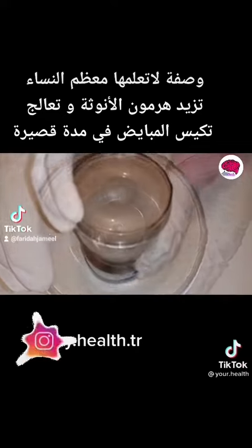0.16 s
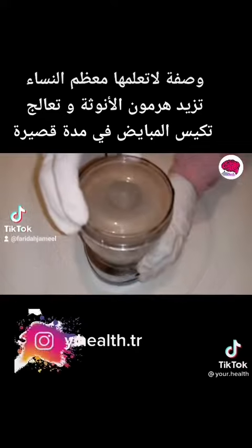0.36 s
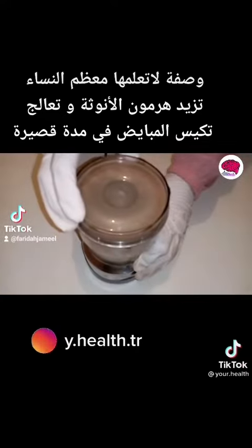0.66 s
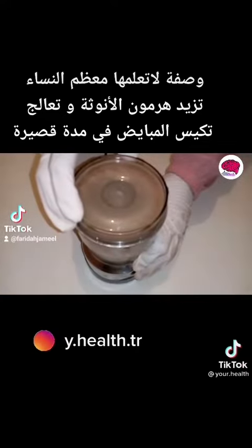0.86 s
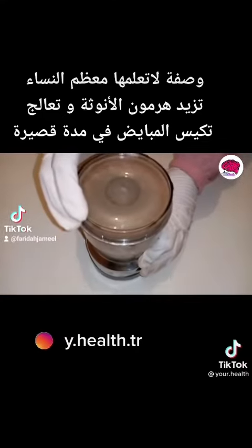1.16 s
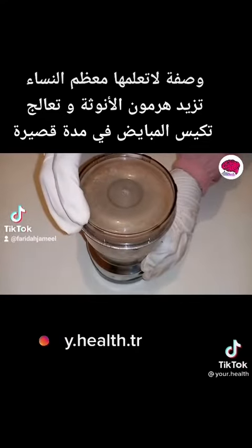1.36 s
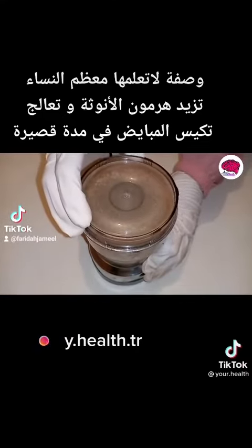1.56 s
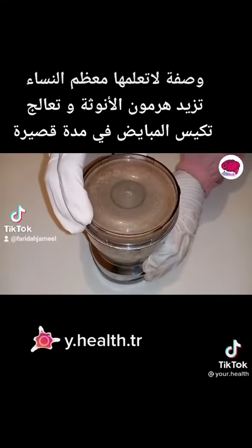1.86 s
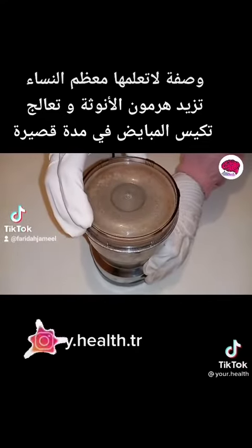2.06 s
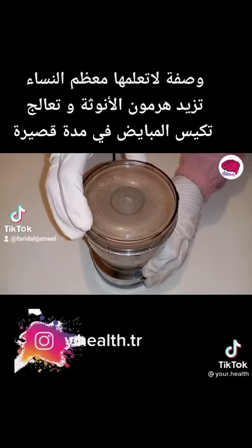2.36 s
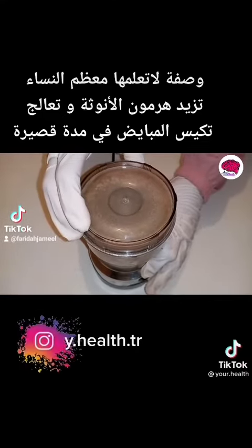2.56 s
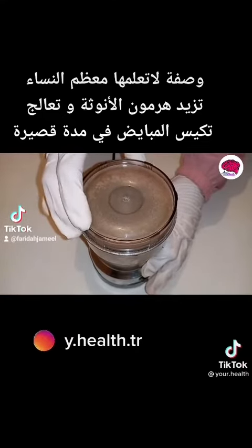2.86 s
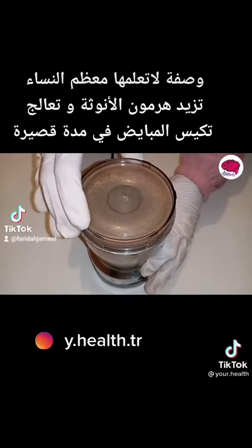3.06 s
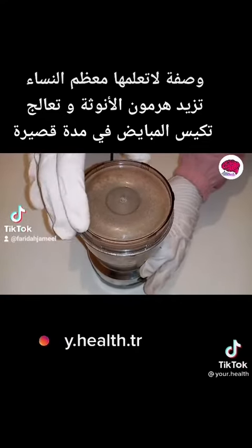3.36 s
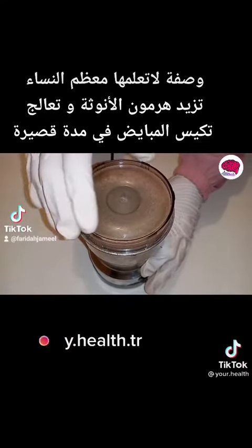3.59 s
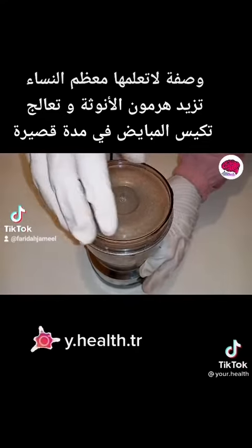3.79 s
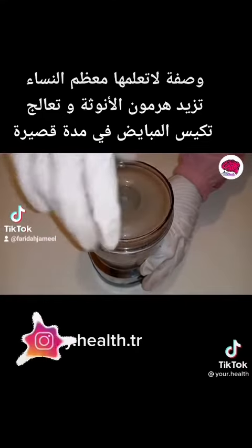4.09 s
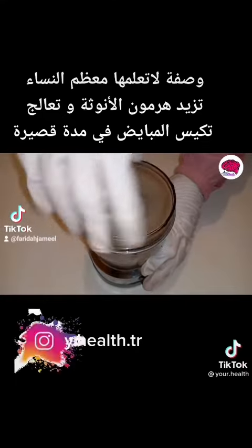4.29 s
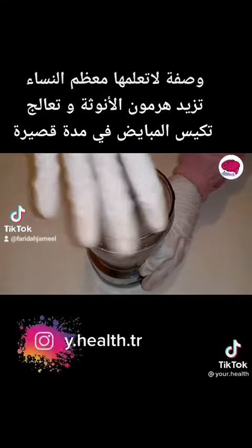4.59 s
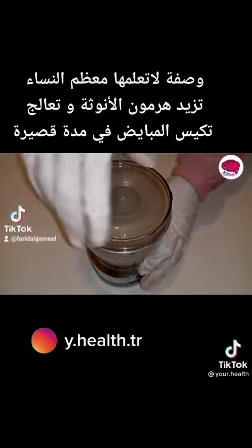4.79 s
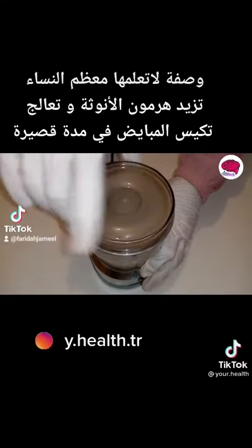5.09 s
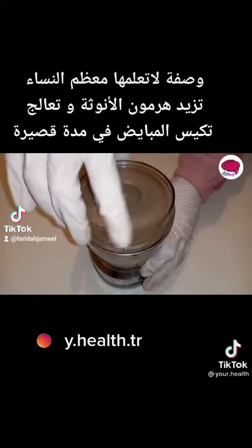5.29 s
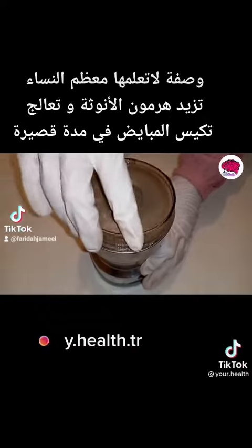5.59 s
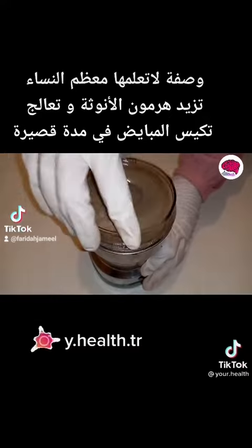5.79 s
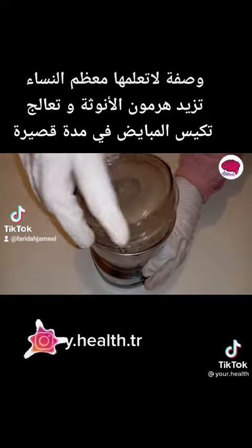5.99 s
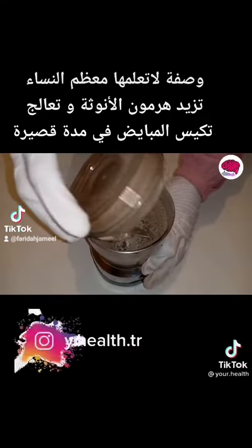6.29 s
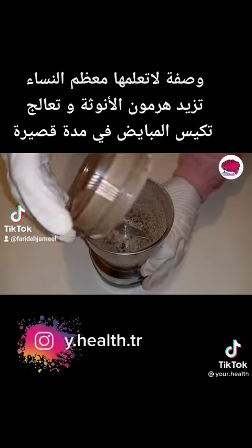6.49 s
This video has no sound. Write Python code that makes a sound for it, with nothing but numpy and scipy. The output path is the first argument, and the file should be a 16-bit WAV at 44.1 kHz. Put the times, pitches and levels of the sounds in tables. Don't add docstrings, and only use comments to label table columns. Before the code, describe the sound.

A small electric grinder whines steadily with powder hissing, spins down to silence, then gloved fingers rub, tap and lift off its plastic lid.

```python
import sys
import numpy as np
from scipy import signal
from scipy.fft import rfft, irfft, next_fast_len
from scipy.io import wavfile
from scipy.ndimage import uniform_filter1d, map_coordinates

SR = 44100
rng = np.random.default_rng(int(sys.argv[2]) if len(sys.argv) > 2 else 0)


def voltage_ratio(level):
    return 10 ** (np.asarray(level, float) / 20)


def log_audio(samples):
    frames = np.atleast_2d(samples).T
    limited = np.clip(frames, -1, 1)
    pcm = np.round(limited * 32767).astype(np.int16)
    wavfile.write(sys.argv[1], SR, pcm)


N = 293265

STAGES_S = [
    .15,
    .46,
    .56,
    .85,
    1.15,
    1.55,
]
# (multiple, level in each of the six stages [dB])
ORDER_DB = [(2, -15.5, -16, -17.5, -19.5, -15.5, -15.5), (3, -5, -0.5, -0.5, -1, -3.5, -4),
            (4, -16, -11.5, -11.5, -10.5, -1.5, -3.5), (5, -6, -5.5, -6, -5, -10.5, -6),
            (6, -17, -13.5, -14, -15.5, -11, -16), (7, -5.5, -2.5, -6.5, -11.5, 3.5, -7.5),
            (8, 0.5, -4.5, 5.5, -2.5, 2.5, -16), (9, -23, -31, -23.5, -12, -22, -34),
            (10, -31, -25.5, -21.5, -19.5, -26.5, -24), (11, -18.5, -9.5, -12, -13.5, -16, -17.5),
            (12, -14.5, -7.5, -9.5, -16.5, -20.5, -5.5), (13, -19, -16.5, -14, -16, -21.5, -18),
            (14, -22, -21, -5.5, -9.5, -15.5, -9), (15, -30.5, -26, -15, -16, -26.5, -25)]
# (time [s], shaft speed [Hz], strength [dB])
LOAD = [(0.0, 542.4, -25), (0.06, 543, -26), (0.16, 544, -28), (.21, 540, -26), (.35, 540.3, -27),
        (0.45, 541.1, -23.5), (0.66, 527.5, -27), (0.88, 526.6, -24), (1.02, 524, -27),
        (1.18, 515.9, -29.5), (1.33, 519.8, -28), (1.6, 517.8, -29.5), (2.18, 516.6, -28.5)]
# (shaft speed [Hz], level [dB])
BASE = [(130, -45.5), (170, -22.5), (277, -19.5), (304, -26.5), (350, -18.5), (420, -9.5), (517, -0.5),
        (541, -0.5)]
# (frequency [Hz], level [dB])
BLADE = [(390, -74), (520, -33.5), (650, -29.5), (830, -10.5), (910, -14), (1005, -2.5), (1120, -12.5),
         (1550, 1)]
# (frequency [Hz], level [dB])
HOUSING = [(400, -21), (700, -4), (950, 4), (1400, -12.5), (2100, -3.5), (3000, 5.5), (3700, -3.5),
           (4250, -3.5), (4700, -1.5), (7000, -2.5)]
LEAN = {1: (-7, 4), 2: (4, 2), 3: (-1, 2), 4: (3, 10), 5: (2, -3), 7: (-4, 2), 8: (7, 0)}
# (time [s], strength [dB])
SWIRL = [(0.0, -37), (0.24, -35.5), (0.7, -32), (1.67, -31.5), (2.14, -32.5), (2.66, -33.5), (2.92, -36),
         (3.16, -39), (3.25, -33.5), (3.3, -38.5), (3.37, -39.5), (3.42, -49.5), (3.52, -81), (3.62, -71.5)]
# (frequency [Hz], level [dB per Hz])
CUP = [(30, -14.5), (90, -11.5), (160, -25.5), (420, -15), (620, -11.5), (760, -15.5), (950, -5.5),
       (1200, -12.5), (1500, -16.5), (2000, -10.5), (3500, -120)]
CHURN = [(900, -42.5), (1300, -17.5), (1600, -6), (2200, -13), (3000, -5), (3800, -10.5), (4600, -7.5),
         (6000, -39), (9000, -120)]
HISS = [(2470, -35), (4200, -11.5), (4400, -11), (5710, -6.5), (6320, 0), (8160, -10), (9240, -9),
        (12200, -11.5), (13800, -7.5), (14400, -5), (15100, 0), (15900, -19.5), (16300, -48)]
# (frequency [Hz], width [Hz], level [dB])
ROCK = [(73.7, 58, -4), (137.7, 62, -6.5)]
# (time [s], frequency [Hz], level [dB])
SQUEAK = [
    (3.39, 867, -59),
    (3.45, 885, -43),
    (3.495, 882, -47),
    (3.555, 863, -83),
    (3.592, 864, -67),
    (3.62, 870, -80),
]
# (time [s], level [dB], jolt over it [dB], cup over it [dB])
KICKS = [(0.0094, -30.5, -40.5, -16.5), (0.136, -13, -6.5, -22), (0.3174, -25, -8.5, -12),
         (0.499, -15.5, -20.5, -9.5), (0.669, -22, -34, -26), (0.759, -19, -34, -21),
         (0.871, -16.5, -19, -31.5), (1.5299, -21, -10, -9.5), (1.7997, -27.5, -9, -16),
         (2.4999, -18, -43, -27), (2.79, -24, -19, -9), (2.825, -23.5, -21.5, -10.5),
         (2.9233, -10.5, -10.5, -23), (2.971, -22, -40.5, -31), (2.981, -24.5, -41.5, -31),
         (3.009, -22.5, -40, -30.5), (3.016, -25, -43, -28.5), (3.09, -24.5, -39.5, -25),
         (3.042, -22.5, -30, -25.5), (3.0633, -14.5, -44.5, -25.5), (3.101, -20.5, -42, -28),
         (3.1192, -17.5, -36, -21), (3.241, -19, -13.5, -11.5), (3.295, -27, -33.5, -23),
         (3.356, -26, -32, -21), (3.3792, -32, -35.5, -21)]
# (frequency [Hz], width [Hz], level [dB])
JOLT = [(83.4, 310, 3), (308, 760, 4.5), (885, 220, 0)]
STEEL = [(1112, 250, -6.5), (1860, 630, -1.5), (3030, 760, 0.5)]
SEED = [(4200, 400, -5.5), (6440, 870, 4.5), (9160, 2000, -0.5), (11800, 4400, -4.5), (15800, 1200, 2.5)]
SLAM = [(1150, 1100, 0)]
# (time [s], lid [dB], counter over lid [dB], nail over lid [dB])
TAPS = [(3.251, -35.5, -2.5, -14), (3.268, -26.5, -16.5, -18), (3.926, -35, -3, -19.5),
        (4.171, -24, -1, -26.5), (4.303, -54, 18, 19), (4.338, -28.5, -2, -9.5), (4.483, -28.5, -41.5, -28),
        (4.818, -21.5, -39.5, -25), (4.826, -16.5, -43, -18), (4.855, -13.5, -15, -27),
        (5.037, -34, -24.5, -19), (5.058, -28.5, -35.5, -15), (5.07, -32, -34.5, -19),
        (5.115, -26.5, -40, -20), (5.139, -26, -48, -15), (5.237, -29.5, -1.5, -19)]
# (time [s], level [dB])
SNAPS = [(3.59, -50), (4.271, -35.5), (4.665, -57), (4.761, -47.5), (4.905, -24.5), (4.914, -23.5),
         (5.347, -29), (5.422, -41.5), (5.686, -36), (5.801, -32), (5.81, -24.5), (5.83, -32)]
# (time [s], lid [dB], counter over lid [dB], nail over lid [dB])
LIFT = [
    (5.43, -37, 9.5, -13),
    (5.468, -34.5, 9, -1),
    (5.501, -42.5, 8.5, -20),
    (5.691, -50, -12, -11),
    (5.743, -57, -22, -16),
    (5.921, -38, 9.5, -1),
    (5.93, -48.5, 11.5, -9.5),
    (5.975, -59.5, 15.5, 2),
    (6.003, -63, 9, 4),
    (6.028, -56, 0, -12),
]
# (time [s], level [dB])
LID_CREAKS = [
    (4.561, -22),
    (4.578, -30),
    (4.672, -34.5),
    (4.783, -35),
]
# (frequency [Hz], width [Hz], level [dB])
COUNTER = [(96.3, 11, -3.5), (182, 13.5, 7), (270, 54, -2), (359.1, 50, -2.5)]
RIM = [(870, 110, -7), (937, 52, -10.5), (1002, 36, -10), (1628, 110, -14), (2000, 30, -16.5),
       (3020, 170, -15.5)]
TICK = [(4350, 130, 1.5), (6030, 554, 8), (6517, 900, 8.5), (7310, 820, 4.5), (8790, 950, -6),
        (12440, 760, -6.5), (15170, 1200, -2.5)]
CLINK = [(4700, 500, -9), (5900, 450, 4), (6500, 500, 5), (7300, 700, 8), (8840, 1040, -5),
         (12500, 900, -18)]
DRUM = [(368, 40, 0.0013)]
# (frequency [Hz], width [Hz], level [dB])
LOOSE = [(843, 210, -16.5), (1105.8, 37, 2.5), (1495, 750, -23.5), (1775, 36, -10), (2330, 92, -19),
         (2967, 209.4, -19), (3430, 110, -12.5)]
POP = [(878, 200, -9), (1110, 63, 5), (1900, 810, -18.5), (2930, 500, -21)]
RING = [(1115, 14, 0.0032)]
HOLLOW = [(705, 84, 5.5), (786, 29.5, -19)]
# (time [s], sliding time [s], lid at end [dB], grit over lid [dB], swell along slide [dB])
STROKES = [(3.787, .072, -47, -5.5, -11), (3.869, 0.12, -36.5, -6.5, -0.5), (4.071, 0.045, -32, -3, 7),
           (4.115, 0.055, -35, 0, 0), (4.287, 0.055, -30.5, -1, 5.5), (4.35, 0.089, -31.5, -4, -1.5),
           (4.476, 0.051, -38.5, -4.5, -2.5), (4.555, .0127, -65.5, 12, -4), (4.575, 0.0086, -56.5, 4, -2),
           (4.665, 0.034, -76, 14, 2), (4.762, 0.04, -67, 16, 8), (4.795, 0.064, -30, -5, 1.5),
           (4.898, .0103, -46.5, 12.5, 0), (5.0, .03, -68, 20, 5), (5.03, .07, -32, -9, 2),
           (5.1, 0.064, -33.5, -1, -1), (5.228, .05, -30.5, -5.5, 4), (5.28, 0.048, -35, -3, 0.5),
           (5.345, 0.038, -50, 7.5, -2), (5.424, .012, -37.5, -15, 0.5), (5.449, 0.014, -32.5, -3.5, 2),
           (5.48, 0.063, -46, -22.5, -9), (5.58, 0.267, -72, -3, 5), (5.635, 0.032, -77, 10.5, 0),
           (6.47, 0.15, -84, 11, 4)]
# (frequency [Hz], width [Hz], level [dB])
LID = [(919, 140, 3), (1056, 106, 6), (1500, 570, -12.5), (1820, 370, -8), (3028, 250, -12)]
CREAK = [(962, 30, -26), (2090, 62, 1), (2995, 280, -1)]
SING = [(1115, 50, 0), (1790, 50, -4), (2400, 70, -7), (3450, 90, -5)]
# (frequency [Hz], level [dB per Hz])
GRIT = [(1760, 8.5), (3000, -10), (4010, -5), (4340, -9), (5840, -3.5), (6870, -22), (8200, -8),
        (11400, -16.5), (13600, -24.5), (15000, -7.5), (15800, -33), (16300, -36.5)]
# (time [s], frequency [Hz], level [dB])
GAP = [
    (5.918, 717.3, -24),
    (5.934, 720, -27.5),
    (5.986, 699.3, -57),
    (6.046, 828, -53.5),
    (6.1, 776, -85),
]
# (frequency [Hz], level [dB])
KITCHEN = [(15, -66.5), (25, -21), (75, -9), (180, -12.5), (277, -27), (344, -16.5), (439, -28.5),
           (607, -24), (1020, -31), (2690, -29), (3720, -32.5), (16000, -42)]
# (frequency [Hz], time to fall 60 dB [s])
WALLS = [(150, 0.11), (1000, 0.25), (4000, 0.25), (14000, 0.021)]
# (frequency [Hz], level [dB])
LEFT = [(60, 5), (200, 2.5), (500, 8.5), (800, 4), (1500, 13.5), (2500, 7.5), (4500, 1.5), (7000, 8),
        (10000, -1), (15000, 1.5)]
# (frequency [Hz], likeness [0-1])
ALIKE = [(30, 0.82), (80, 0.92), (300, 0.71), (1500, 0.85), (3000, 0.53), (6000, 0.33), (15000, 0.2)]
# (frequency [Hz], phase [rad])
TWIST = [(250, 0), (520, 1.25), (541, 1.9), (1000, 0.18), (1400, 0), (1555, -.25), (1620, -.7), (2050, -.2),
         (2590, -.6), (2700, -1), (3300, 0)]
# (frequency [Hz], width [Hz], level [dB])
NOTCHES = [(4300, 200, -10), (8400, 400, -3), (12200, 450, -7), (13900, 300, -8)]
# (frequency [Hz], level [dB])
MASK = [(150, -36), (700, -24), (1500, -24), (3000, -19), (4300, -8), (6000, -10), (8500, -5.5),
        (11000, -3), (12200, -2), (13100, -3.5), (14000, -2), (15000, -7)]

OFF_S = 2.19
LOOSE_S = 5.42
STEADY_DB = 1.2


def unit(x):
    return x / np.sqrt(np.mean(x ** 2) + 1e-20)


def along(points, hz):
    f, v = np.transpose(points)
    return np.interp(np.log(hz + 1), np.log(f + 1), v)


def curves(rows):
    s, *cols = np.transpose(rows)
    return [np.interp(np.arange(N) / SR, s, c) for c in cols]


def gate(start, end, fade):
    t = np.arange(N) / SR
    return np.clip((t - start) / fade, 0, 1) * np.clip((end - t) / fade, 0, 1)


def wobble(rate):
    coarse = np.arange(0, N + 16, 16)
    knots = rng.standard_normal(int(N * rate / SR) + 4)
    return np.interp(np.arange(N), coarse, map_coordinates(knots, [coarse * rate / SR]))


def filtered(x, response):
    m = next_fast_len(N + SR // 2)
    return irfft(rfft(x, m) * response(np.fft.rfftfreq(m, 1 / SR)), m)[..., :N]


def modes(table):
    def response(f):
        return sum((-1) ** k * voltage_ratio(db) * 1j * f * w / (c * c - f * f + 1j * f * w)
                   for k, (c, w, db) in enumerate(table))
    return response


def shade(points):
    return lambda hz: voltage_ratio(along(points, hz))


def grains(grain_db, rate):
    size = voltage_ratio(grain_db * np.array([wobble(rate), wobble(rate)]))
    return size * rng.standard_normal((2, N))


def shaft():
    hz, db = curves(LOAD)
    drag_per_s, rub_hz = 1.15, 101.4
    off = np.clip(np.arange(N) / SR - OFF_S, 0, None)
    return np.clip((hz + rub_hz) * np.exp(-drag_per_s * off) - rub_hz, 1, None), db, off


def motor():
    hz, db, off = shaft()
    t = np.arange(N) / SR
    turn = 2 * np.pi * np.cumsum(hz * (1 + 0.001 * wobble(9) + .001 * wobble(35))) / SR
    regrip_s = 1.0
    after = np.clip((t - regrip_s) / .12 + .5, 0, 1)

    def line(k, level_db, flutter_db):
        flutter = flutter_db * wobble(14)
        flutter = flutter + 1.2 * gate(-1, 0.2, 0.06) * wobble(80)
        flutter = flutter + 10 * np.clip(off, 0, .5) * wobble(35)
        blur = 0.13 * k ** .5 * (1 + 5.5 * off) * wobble(60)
        tone = voltage_ratio(level_db + flutter) * np.sin(k * turn + blur + rng.uniform(0, 5.9))
        early, late = LEAN.get(k, (0, 0))
        alike = np.clip(along(ALIKE, k * hz[0]), .05, .95)
        lean = np.tanh((early + (late - early) * after) * np.log(10) / 40)
        return tone * np.array([1 + 0 * t, np.sqrt(alike / (1 - alike)) * lean])

    dip_db = sum(-7.5 * np.exp(-((t - s) / 0.013) ** 2) for s in (0.055, .15))
    whine = line(1, db + dip_db + along(BASE, hz) + 8.5, 0.36)
    orders_db = -20.5
    upper_db = orders_db - 23.5 * (1 - np.exp(-off / 0.44))
    for k, *stage_db in ORDER_DB:
        k, stage = round(k), np.interp(t, STAGES_S, stage_db)
        if k == 3:
            throb = 1 + 0.6 * gate(-1, 0.2, 0.14) * np.cos(2 * np.pi * 36 * (t - 0.011))
            whine += throb * line(k, orders_db + stage + along(BLADE, k * hz), 0.93)
            continue
        stage = stage - 22 * max(k - 8, 0) * np.clip(off, 0, 1)
        if k == 2:
            stage = stage + 12 * gate(OFF_S, OFF_S + 0.18, 0.15) + 0.8 * dip_db
        whine += gate(-1, 2.89, 0.3022) * line(k, upper_db + stage + along(HOUSING, k * hz), 1.79)
    hum = voltage_ratio(-50.5 + .5 * wobble(25)) * np.sin(2 * np.pi * 100 * t) * gate(-1, OFF_S + 0.034, 0.031)
    return whine * gate(-1, 3.06, 0.05) + [hum, 0 * hum]


def powder():
    hiss_db, = curves(SWIRL)
    hz, _, off = shaft()
    slow = 1 - hz / hz[0]
    surge = wobble(11.0)

    cup_db = curves(np.add(SWIRL, [0.021, -14]))[0] + 7 * slow
    cup = voltage_ratio(cup_db + 0.43 * surge + 2.4 * wobble(25)) * unit(filtered(grains(3.6, 200), shade(CUP)))
    cup = cup - .6 * gate(OFF_S, 9, 0.082) * filtered(cup, lambda f: f < 620)

    rock_size = voltage_ratio(-53.5 + 2.5 * wobble(20)) * gate(3.2, 3.52, 0.065)
    rock = rock_size * unit(filtered(grains(2.8, 60), modes(ROCK)))

    churn_db = hiss_db - 0.5 - 7 * slow - 3 * gate(OFF_S, 2.62, .1)
    churn = voltage_ratio(churn_db + STEADY_DB * wobble(32.07)) * unit(filtered(grains(2.8, 400), shade(CHURN)))

    hiss_size = voltage_ratio(hiss_db + 0.24 * surge + 2.04 * wobble(29.73))
    hiss = hiss_size * unit(filtered(grains(0.874, 900), shade(HISS)))
    hiss = hiss - 0.35 * gate(-1, 1.5, .5) * filtered(hiss, lambda f: np.exp(-((f - 6600) / 570) ** 2))

    squeak_hz, squeak_db = curves(SQUEAK)
    turn = 2 * np.pi * np.cumsum(squeak_hz * (1 + 0.011 * wobble(70))) / SR
    squeak = voltage_ratio(squeak_db + 0.5 + 2.2 * wobble(27.945)) * (np.sin(turn) + 0.24 * np.sin(2 * turn))
    squeak = squeak * gate(3.39, 3.63, 0.019)
    return (cup + rock + churn + hiss) * gate(-1, 3.64, 0.044) + [squeak, 0 * squeak]


def hits(events, base, body, bright, push_s, blow_s, tick_s):
    push, blow, tick, air = np.zeros((4, N + SR))
    t = np.arange(SR // 20) / SR
    bursts = rng.standard_normal((len(events), 3, len(t)))

    def bump(life):
        return t / life * np.exp(1 - t / life)

    for (s, base_db, body_db, tick_db, *air_db), burst in zip(events, bursts):
        at = slice(round(s * SR), round(s * SR) + len(t))
        click = voltage_ratio(2.5) * bump(0.00019)
        push[at] += voltage_ratio(base_db) * bump(push_s)
        blow[at] += voltage_ratio(body_db) * (bump(blow_s) * burst[0] + click)
        tick[at] += voltage_ratio(tick_db) * bump(tick_s) ** 2 * burst[1]
        air[at] += sum(voltage_ratio(level) for level in air_db) * bump(0.0035) * burst[2]

    def steep(f):
        return modes(body)(f) * 1j * f / (500 + 1j * f) / (1 + 1j * f / 3500)

    def hollow(f):
        return modes(HOLLOW)(f) / (1 + 1j * f / 700) ** 2

    solid = filtered(push[:N], modes(base)) + filtered(blow[:N], steep)
    return solid + filtered(tick[:N], modes(bright)) + filtered(air[:N], hollow)


def seed_knocks():
    s, db, jolt, cup = np.transpose(KICKS)
    events = np.c_[s, db + jolt + 6, db + cup + 19, db + 6]
    seeds = hits(events, JOLT, STEEL, SEED, 0.0002, .0018, 0.0027)
    slam = hits([(2.9236, -10, -99, -99)], SLAM, STEEL, TICK, 0.0001, .001, .001)
    return seeds + slam


def rim_snaps():
    lid_db, counter_db = -19.5, -33.5
    return [(s, db + lid_db, counter_db - lid_db, -lid_db) for s, db in SNAPS]


def lid_taps():
    s, db, counter, nail = np.transpose(TAPS + [snap for snap in rim_snaps() if snap[0] < LOOSE_S])
    events = np.c_[s, db + counter + 13, db + 20, db + nail + 10.5]
    taps = hits(events, COUNTER, RIM, TICK[:6], 0.000339, 0.0015, 0.0023)
    creaks = hits([(s, -99, db, db - 12.5) for s, db in LID_CREAKS], DRUM, CREAK, TICK[:5], .001, .0015, .002)
    thump = hits([(5.689, -20.5, -99, -99)], DRUM, CREAK, TICK, 0.00067, .001, .001)
    return taps + creaks + thump


def strokes(db, fall_db_per_s):
    t, total = np.arange(N) / SR, np.zeros(N)
    for (s, hold, *_, swell_db), level in zip(STROKES, db):
        swell = swell_db * (np.clip((t - s) / hold, 0, 1) - 1)
        fall = fall_db_per_s * np.clip(t - s - hold, 0, 1)
        grip = np.clip((t - s) / 0.0099, 0, 1) ** 2
        total += voltage_ratio(level + swell - fall) * grip
    return 20 * np.log10(total + 1e-9)


def patchy(x, patchy_db):
    z = signal.stft(x, nperseg=256)[2]
    field = uniform_filter1d(rng.standard_normal(z.shape[1:]), size=3, axis=0)
    field = uniform_filter1d(field, size=12, axis=1)
    return unit(signal.istft(z * voltage_ratio(patchy_db * unit(field)), nperseg=256)[1][:, :N])


def glove():
    _, _, lid, grit, _ = np.transpose(STROKES)
    lid_db, grit_db = strokes(lid, 451.5), strokes(lid + grit, 451)
    slips = patchy(grains(3.5, 150), patchy_db=3.2)
    seated = gate(-1, LOOSE_S + 0.16, 0.0514)

    def seated_lid(f):
        return modes(LID)(f) * (1j * f / (500 + 1j * f)) ** 2

    def gritty_rim(f):
        return np.hypot(shade(GRIT)(f), .5 * np.abs(modes(TICK[:4])(f))) * (f / (900 + f)) ** 2

    shell = seated * unit(filtered(slips, seated_lid))
    shell = shell + (1 - seated) * voltage_ratio(3.0) * unit(filtered(slips, modes(LOOSE)))
    rub = voltage_ratio(lid_db - 6.5 + STEADY_DB * wobble(40) + 0.97 * wobble(85)) * shell

    scrape_size = voltage_ratio(grit_db - 1.2 + STEADY_DB * wobble(41) - 1.65 * (2.0 - seated))
    scrape = scrape_size * unit(filtered(patchy(grains(0.86, 700), patchy_db=3.0), gritty_rim))

    drag = voltage_ratio(lid_db - 24.5 + 1.7 * wobble(12)) * unit(filtered(slips[::-1], modes(COUNTER)))
    creak_size = voltage_ratio(-75 + 3.1 * wobble(30.095)) * gate(4.1, 5.7, 0.011)
    creak = creak_size * unit(filtered(grains(3, 72), modes(CREAK)))
    sing_size = voltage_ratio(-60 + 3.5 * wobble(28)) * gate(5.49, 5.885, .03)
    sing = sing_size * unit(filtered(slips[::-1], lambda f: modes(SING)(f) ** 2))
    return (rub + scrape + drag + creak + sing) * gate(3.75, 7, 0.023)


def loose_lid():
    held_db = -6.5
    snaps = [(s, db + held_db, counter, nail - held_db)
             for s, db, counter, nail in rim_snaps() if s > LOOSE_S]
    s, db, counter, nail = np.transpose(LIFT + snaps)
    events = np.c_[s, db + counter + 13, db + 25, db + nail + 9, db + counter + 21]
    clinks = hits(events, COUNTER, LOOSE, CLINK, 0.0035, 0.0022, 0.0032)
    pop_db = 5.1
    pop = hits([(5.468, pop_db - 7.5, pop_db, -99)], RING, POP, TICK, 0.00015, .0025, .001)
    return clinks + pop


def gap():
    hz, db = curves(GAP)
    turn = 2 * np.pi * np.cumsum(hz) / SR + .9 * wobble(90)
    return voltage_ratio(db + 1.0 + 3.6 * wobble(70)) * np.sin(turn) * gate(GAP[0][0], GAP[-1][0], 0.0075)


def kitchen():
    size = voltage_ratio(-69 - 0.5 + 2.1 * wobble(17))
    return size * unit(filtered(rng.standard_normal((2, N)), shade(KITCHEN)))


def walls(x):
    hz, t, z = signal.stft(rng.standard_normal((2, SR // 2)), SR, nperseg=256)
    tail = signal.istft(z * voltage_ratio(-60 * t / along(WALLS, hz)[:, None]), SR, nperseg=256)[1]
    return signal.fftconvolve(np.pad(x, (300, 0))[None], tail / np.linalg.norm(tail[0]), axes=1)[:, :N]


def ports(pair):
    m = next_fast_len(N + SR // 2)
    hz = np.fft.rfftfreq(m, 1 / SR)
    a, b = rfft(pair, m)
    same = np.sqrt(np.clip(along(ALIKE, hz), 0, 1))
    other = np.sqrt(1 - same ** 2)
    tilt = voltage_ratio(along(LEFT, hz) / 2)
    lag_s = 45 / 44100
    lag = np.exp(1j * along(TWIST, hz) - 2j * np.pi * hz * lag_s)
    norm = 2 / np.sqrt(tilt ** 2 + tilt ** -2)
    left = (same * a + other * b) * tilt * lag
    right = (same * a - other * b) / tilt
    return irfft(norm * np.array([left, right]), m)[:, :N]


def scene():
    whine = motor()
    hard = seed_knocks() + lid_taps() + loose_lid() + gap()
    near = powder() + glove() + [hard, 0 * hard] + whine
    echo = walls(near[0] - 0.56 * whine[0])
    return ports(near + kitchen()) + voltage_ratio(-11.5) * echo


def thinned(x):
    hz, _, z = signal.stft(x, SR, nperseg=1024)
    power = np.mean(np.abs(z) ** 2, axis=0)
    band = uniform_filter1d(uniform_filter1d(power, size=5, axis=0), size=3, axis=1)
    around = uniform_filter1d(band, size=41, axis=0)
    luck = rng.standard_normal((band.shape[0] // 6 + 1, band.shape[1] // 7 + 1))
    luck = luck.repeat(6, axis=0).repeat(7, axis=1)
    luck_db = 3 * luck[:band.shape[0], :band.shape[1]]
    contrast_db = 10 * np.log10(np.abs(band / (around + 1e-20)) + 1e-9)
    margin_db = contrast_db - along(MASK, hz)[:, None] + luck_db
    keep = .02 + .98 / (1 + np.exp(-np.clip(2 * margin_db, -30, 30)))
    return signal.istft(z * keep, SR, nperseg=1024)[1][:, :N]


def top_cut(x):
    return signal.sosfilt(signal.butter(12, 16860, fs=SR, output="sos"), x)


def record(dry):
    def phone(hz):
        dips = voltage_ratio(sum(db * np.exp(-((hz - c) / w) ** 2) for c, w, db in NOTCHES))
        bass_cut = (1j * hz / (40 + 1j * hz)) ** 2
        return dips * bass_cut * np.clip((16100 - hz) / 500, 0, 1)

    mix = thinned(filtered(dry, phone))
    return top_cut(mix)


dry = scene()
out = record(dry)
log_audio(out)
```